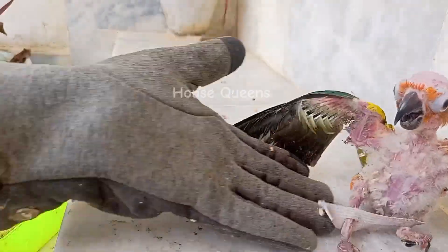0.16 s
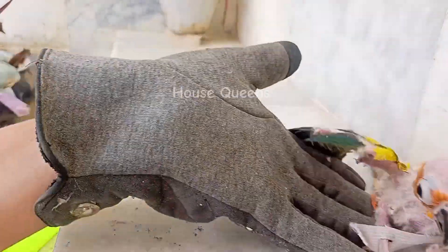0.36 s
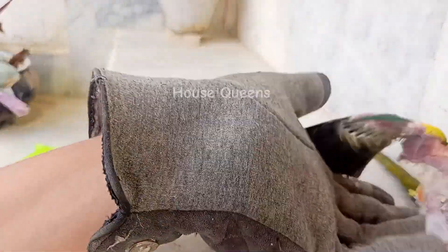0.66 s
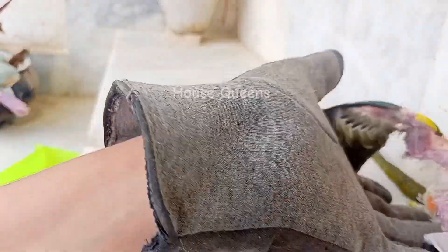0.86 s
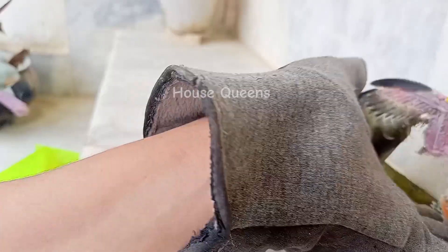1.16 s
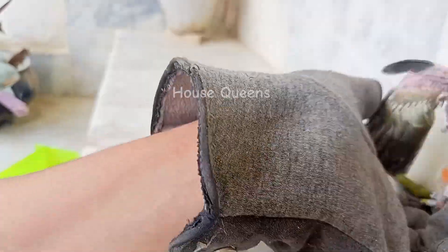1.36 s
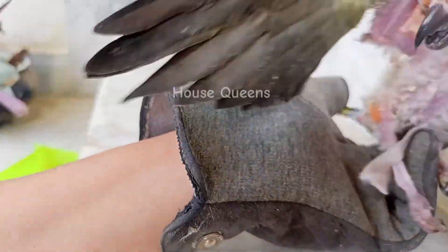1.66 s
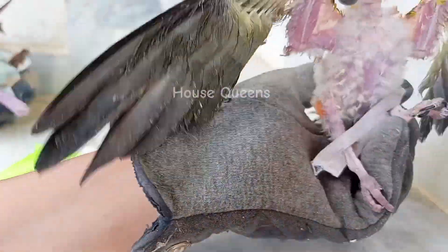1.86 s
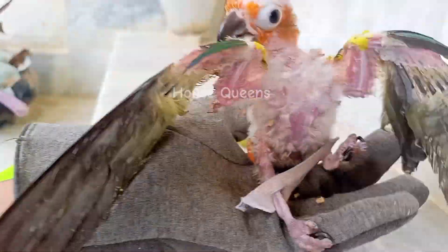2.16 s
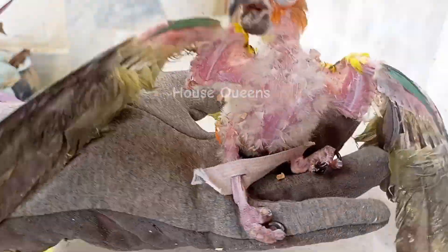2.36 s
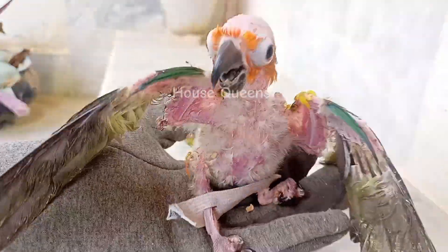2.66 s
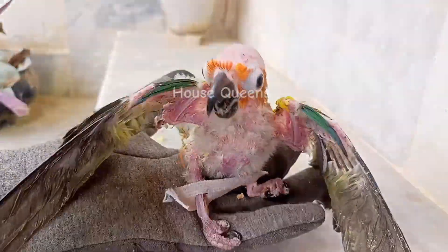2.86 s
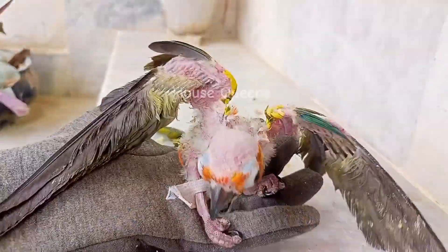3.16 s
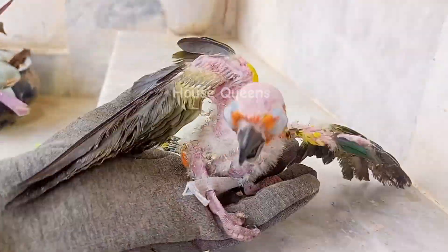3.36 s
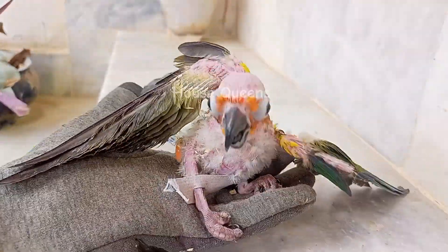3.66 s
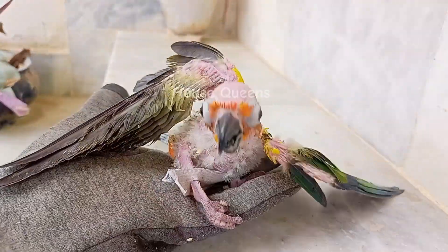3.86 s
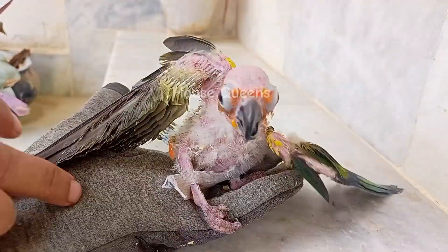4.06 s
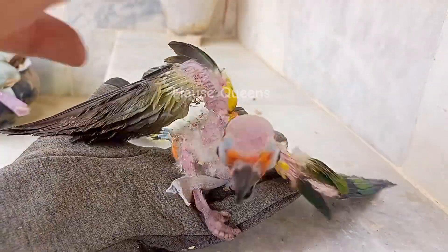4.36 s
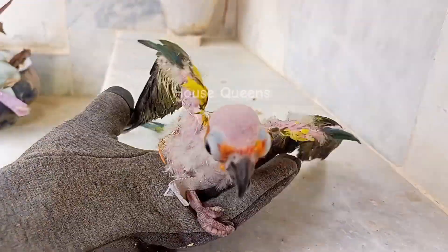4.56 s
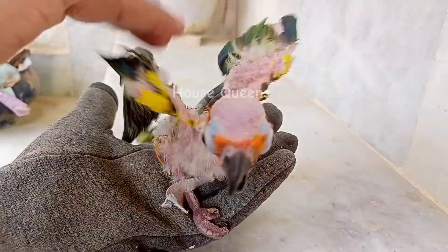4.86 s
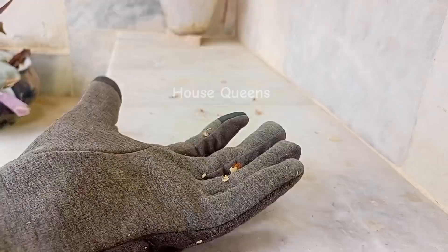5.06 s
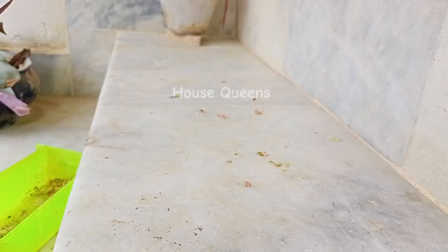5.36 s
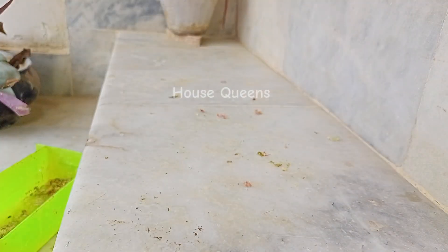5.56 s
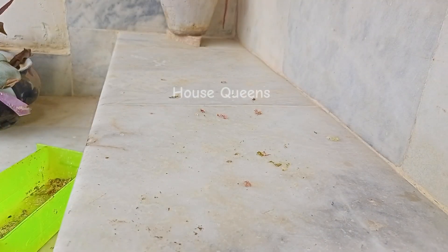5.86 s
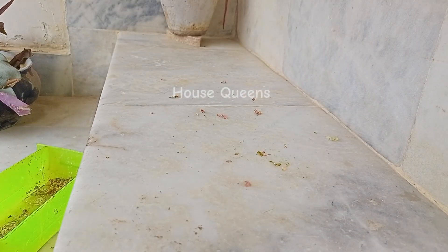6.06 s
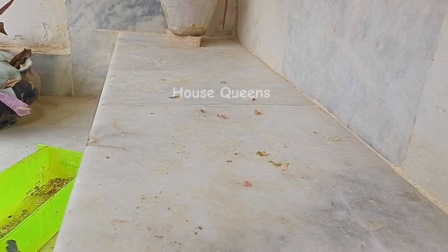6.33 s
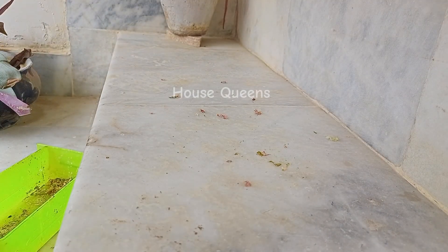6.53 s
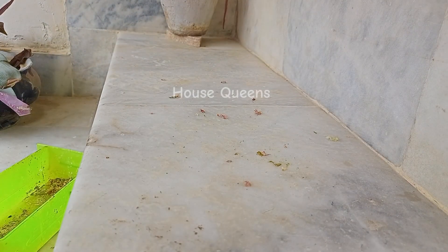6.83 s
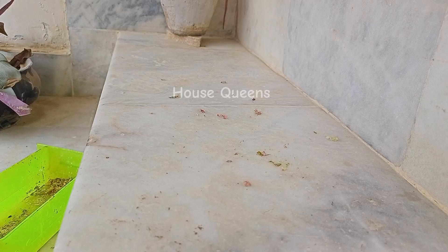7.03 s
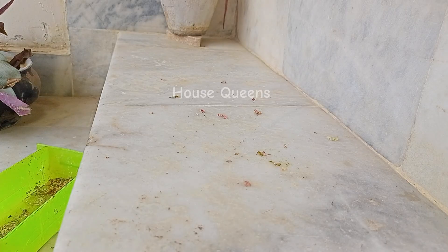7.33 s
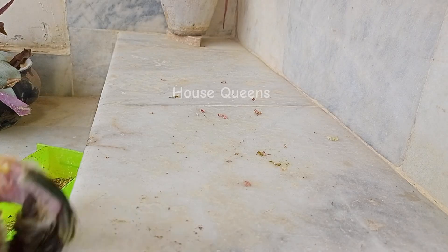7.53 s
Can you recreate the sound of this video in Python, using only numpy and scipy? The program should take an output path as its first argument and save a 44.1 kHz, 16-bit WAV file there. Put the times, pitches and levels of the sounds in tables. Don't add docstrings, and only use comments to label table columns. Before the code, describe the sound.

Hoarse, raspy chick cries come and go over a soft fan hum, with a sudden sharp croak, a wooden knock and echoing final squawks.

```python
import sys
import numpy as np
from scipy import signal
from scipy.fft import rfft, irfft, next_fast_len
from scipy.io import wavfile
from scipy.ndimage import uniform_filter1d, map_coordinates

SR = 44100
rng = np.random.default_rng(int(sys.argv[2]) if len(sys.argv) > 2 else 0)


def int16_out(signal):
    q = np.round(np.clip(np.atleast_2d(signal).T, -1, 1) * 32767)
    wavfile.write(sys.argv[1], SR, q.astype(np.int16))


def boost_factor(decibels):
    exponent = np.asarray(decibels, float) / 20
    return 10 ** exponent


N = 339129

# frequency in Hz, level in dB per Hz.
THROAT_COLOUR = [(1000, -49), (1700, -15.5), (1940, -23.5), (2230, -11.5), (2630, -5), (3230, -3),
                 (3540, -3.5), (4300, -5.5), (4590, -4), (5130, -14), (7170, -20), (8090, -9), (9740, -28),
                 (15600, -32)]


def unit(x):
    return x / np.sqrt(np.mean(x ** 2) + 1e-20)


def along(points, hz):
    f, v = np.transpose(points)
    return np.interp(np.log(hz + 1), np.log(f + 1), v)


def curve(rows):
    return np.interp(np.arange(N) / SR, *np.transpose(rows))


def wobble(rate, size=N):
    knots = rng.standard_normal(size // 30 + 4)
    return map_coordinates(knots, [np.arange(size) * min(rate, 1400) / SR])


def filtered(x, response):
    m = next_fast_len(N + SR // 2)
    return irfft(rfft(x, m) * response(np.fft.rfftfreq(m, 1 / SR)), m)[:N]


def hiss(spectrum, patchy_db=0):
    z = signal.stft(rng.standard_normal(N), nperseg=256)[2]
    patches = uniform_filter1d(rng.standard_normal(z.shape), 4, 0)
    patches = uniform_filter1d(patches, 10, 1)
    white = signal.istft(z * boost_factor(patchy_db * unit(patches)), nperseg=256)[1][:N]
    return unit(filtered(white, lambda hz: boost_factor(along(spectrum, hz))))


def add(track, s, sound):
    part = track[round(s * SR):][:len(sound)]
    part += sound[:len(part)]


def fan():
    # time in seconds, level in dB.
    drone = [(0.0, -36.5), (4.11, -37.5), (6.0, -41.5), (7.05, -39), (7.69, -42)]
    # frequency in Hz, level in dB per Hz.
    air = [(12, -58), (22, -19), (50, -9.5), (110, -6.5), (200, -7), (240, -1.5), (307, -9), (600, -12),
           (1000, -16.5), (1600, -19.5), (2400, -21), (3400, -25.5), (4500, -41.5), (6500, -51),
           (15600, -70)]
    # start in seconds, length in seconds, change in dB.
    duck = (4.9, .05, -13)
    t = np.arange(N) / SR
    hums = 0
    for hz, db, rate in [(99.1, -8, 30), (242.2, -11.5, 20)]:
        level = boost_factor(db + 2.5 * wobble(14))
        hums = hums + level * np.sin(2 * np.pi * hz * t + 2.18 * wobble(rate))
    start, length, duck_db = duck
    from_middle = (t - start - length / 2) / (length / 2)
    dip = duck_db * np.clip(1 - from_middle ** 4, 0, 1)
    return boost_factor(curve(drone) + 1.25 * wobble(5) + dip) * unit(hiss(air) + hums)


def feathers():
    # time in seconds, level in dB.
    rustle = [(0, -65), (.5, -64), (1.7, -59.5), (2.9, -61.5), (3.45, -66), (3.95, -65), (4.7, -62),
              (4.83, -59.5), (5.2, -61.5), (5.3, -72), (6.4, -67.5), (6.55, -64), (6.7, -71), (6.82, -56.5),
              (6.93, -63), (7.05, -70.5), (7.69, -77)]
    # frequency in Hz, level in dB per Hz.
    feather = [(2500, -39), (4200, -3.5), (6600, -14), (8200, -7.5), (10500, -25.5), (13500, -18.5),
               (15800, -20)]
    # time in seconds, peak in dB.
    ticks = [(0.4978, -55), (3.3294, -59), (3.4925, -58), (5.5144, -56)]
    gain = boost_factor(curve(rustle) + 3 * wobble(27) + 2 * wobble(300))
    for s, db in ticks:
        t = np.arange(SR // 10) / SR
        add(gain, s, boost_factor(db + 1 - 60 * t / 0.064))
    return gain * hiss(feather, patchy_db=4)


def voices():
    # start in seconds, length in seconds, half pitch from Hz, to Hz, level in dB.
    full = [(2.67, .1, 1018, 1000, -31), (4.24, .105, 1210, 1098, -19.5), (4.355, .14, 1146, 1059, -20),
            (4.505, .115, 1143, 1088, -24), (7.462, .108, 1110, 1126, -25.5)]
    deep = [(6.15, 0.0844, 813, 787, -20)]
    shut = [(0.745, .076, 1032, 1085, -29), (0.826, 0.1006, 1213, 1135, -34), (0.93, .12, 1122, 954, -26.5),
            (1.376, .075, 1036, 1023, -28), (1.98, 0.1794, 997, 996, -32), (2.168, .04, 1190, 1175, -34.5),
            (4.165, .08, 987, 1068, -30.5)]
    doubled = [(0.692, .065, 1120, 1063, -36.5), (1.049, 0.15, 1042, 1014, -30.5),
               (1.449, 0.076, 1140, 1170, -30), (2.35, .08, 1156, 1067, -34),
               (4.62, 0.054, 1370, 1373, -41)]
    thin = [(1.225, .032, 1185, 1224, -40), (1.6, 0.056, 1120, 1110, -41), (1.761, .07, 1240, 1222, -39),
            (1.863, 0.031, 1357, 1385, -31), (2.953, .065, 1310, 1220, -40),
            (4.035, .045, 1417, 1308, -38.5)]
    high = [(0.039, 0.052, 1450, 1330, -37.5), (1.257, 0.11, 1386, 1675, -35),
            (2.208, .07, 1544, 1610, -31), (2.563, 0.1076, 1495, 1515, -35.5),
            (7.578, 0.114, 1345, 1430, -33.5)]
    raw = [(0.579, .11, 1327, 1228, -37), (1.884, 0.0887, 1543, 1484, -32), (2.28, .07, 1317, 1350, -34),
           (2.43, 0.12, 1408, 1400, -35), (4.081, .075, 1380, 1473, -38)]
    bright = [(0.099, .15, 1093, 1094, -23), (7.338, .126, 1169, 1002, -23.5)]
    clear = [(3.85, .08, 799.5, 804.5, -35)]
    faint = [(3.022, 0.075, 1540, 1560, -40), (3.182, .085, 1385, 1393, -45),
             (3.702, 0.13, 1493, 1494, -45.5), (5.977, 0.099, 1200, 1350, -39)]
    return full, deep, shut, doubled, thin, high, raw, bright, clear, faint


def shape(t, start, length, attack):
    onset_db, release_db = -9.5, -22
    enter_db, leave_db, enter_share = -9.5, -6, 0.38
    join_s = 0.012
    s, n = np.transpose([row[:2] for voice in voices() for row in voice])

    def touch(gap):
        return np.clip(1 - np.abs(gap).min() / join_s, 0, 1)

    enter, leave = touch(s + n - start), touch(s - start - length)
    attack = min(attack * (1 - enter * (1 - enter_share)), 0.87 * length)
    rise = np.clip(1 - (t - start) / attack, 0, 1) * (onset_db + enter * (enter_db - onset_db))
    fall = np.clip((t - start - attack) / (length - attack), 0, 1) ** 1.51
    return rise + fall * (release_db + leave * (leave_db - release_db))


def membrane(phase, levels, jitter_hz):
    n = len(phase)
    fuzz = 0.3 + jitter_hz / 28
    voice = 0
    for k, db in levels.items():
        rate = 150 + 2.2 * k * jitter_hz
        smear = fuzz * (wobble(rate, size=n) + 1j * wobble(rate, size=n))
        line = ((1 + smear) * np.exp(1j * k * phase)).real
        voice = voice + boost_factor(db + 6.5) * line / np.sqrt(1 + 2 * fuzz ** 2)
    return voice


def squawks():
    # 2nd, 3rd, 4th multiple, upper voice, all in dB against the level.
    multiples = [(-4, -6, -1, -7), (-7.5, -9, -1, -12), (-53, -7.5, 0, -11), (-17, -2, -11, -9),
                 (-1, -33, -2, 3), (1.5, -31, -8, -4.5), (1, 0.5, -9, -11.5), (-4.5, -9, 0, -6),
                 (-4, -24, -2, -6), (-4, 0, -16, -13)]
    jitter = [27, 30, 36, 52, 32, 30, 46, 22, 9, 58]
    # rasp in dB against the voice, attack in seconds, trill depth in dB.
    hoarse = [(-5, 0.052, 0), (-2, .04, 5.5), (0, 0.052, -1.5), (2.5, 0.036, 0.5), (-10, 0.015, -1.5),
              (-3.5, 0.023, 0), (0, 0.042, -0.5), (-6, 0.047, -0.5), (-7, 0.019, .8), (1, 0.033, -1.5)]
    # time in seconds, extra level in dB.
    throbs = [(7.395, 3.5), (7.421, 3)]
    trill_hz, trill_lag_s = 88, 0.004
    catch_s, catch_db = 0.018, -6
    fade = 0.012
    out, breath = np.zeros(N), hiss(THROAT_COLOUR, patchy_db=6)
    notes = [(*row, mix, jitter_hz, *rough)
             for rows, mix, jitter_hz, rough in zip(voices(), multiples, jitter, hoarse)
             for row in rows]
    for s, length, from_hz, to_hz, level_db, mix, jitter_hz, rasp_db, attack, trill_db in notes:
        span = np.arange(round(s * SR), min(round((s + length + fade) * SR), N))
        t, n = span / SR, len(span)
        sink_db = shape(t, s, length, attack)

        pitch = from_hz + (to_hz - from_hz) * (np.abs(t - s) / length) ** 0.75
        pitch = pitch * (1 + 0.0015 * sink_db)
        phase = 2 * np.pi * np.cumsum(pitch + 0.345 * jitter_hz * wobble(201.2, size=n)) / SR

        second, third, fourth, upper = [level_db + db + sink_db * (1 + 0.094 * (k - 1))
                                        for k, db in enumerate(mix)]
        brighten_db = 0.1 * (level_db + 27)
        fourth, upper = fourth + brighten_db, upper + brighten_db
        doubling = np.clip(third - np.maximum(second, fourth), -18, 0)
        levels = {2: second, 3: third, 4: fourth}
        for k in range(5, 14):
            lift = np.minimum(along(THROAT_COLOUR, k * pitch) - along(THROAT_COLOUR, 8440), 1.5)
            levels[k] = upper - 5 + lift + doubling * (k % 2)
        voice = membrane(phase, levels, jitter_hz)

        effort = np.sqrt(boost_factor(2 * second) + boost_factor(2 * third) + boost_factor(2 * fourth) + 6 * boost_factor(2 * upper))
        trill = trill_db * np.cos(2 * np.pi * trill_hz * (t - s - trill_lag_s))
        flutter = boost_factor(wobble(133, size=n) + trill)
        catch = boost_factor(catch_db * np.clip(1 - (t - s) / catch_s, 0, 1))
        to_edge = np.minimum(t - t[0], (t[-1] - t) / 2)
        edges = np.sin(np.pi / 2 * np.clip(to_edge / fade, 0, 1)) ** 0.38
        out[span] += edges * flutter * (catch * voice + effort * boost_factor(rasp_db) * breath[span])
    throb_db = np.zeros(N)
    for s, db in throbs:
        add(throb_db, s - 0.005, db * np.hanning(SR // 100))
    return out * boost_factor(throb_db)


def peeps():
    # start in
    # seconds, length in seconds, pitch in Hz, level in dB, octave in dB.
    peep_notes = [(0.191, 0.56, 879, -42.5, -10.5), (0.266, 0.095, 3460, -49.5, 1),
                  (1.1, .12, 3020, -56.5, 17.5), (1.255, 0.032, 4640, -40, -12), (1.3, 0.09, 3150, -73, 9),
                  (1.604, 0.072, 3060, -55, 22), (1.764, 0.061, 2900, -45, 10),
                  (2.05, 0.083, 1944, -39.5, -20), (2.5, 0.063, 1550, -43.5, -20),
                  (4.08, 0.047, 4050, -31, -9), (4.838, 0.03, 4400, -40, -17),
                  (5.529, 0.15, 1700, -53, -25), (5.98, .04, 3100, -58, 8), (6.515, 0.059, 4840, -51, -14),
                  (6.7, 0.041, 3000, -49, -29), (6.79, .11, 3500, -64, 3), (6.852, 0.092, 1300, -53, -23),
                  (7.59, 0.07, 5440, -28.5, -19), (7.663, 0.038, 4170, -32.5, -8)]
    out = np.zeros(N)
    for s, length, hz, db, octave_db in peep_notes:
        u = np.arange(round(length * SR)) / (length * SR)
        wander_hz = 61 + 0.033 * hz
        phase = 2 * np.pi * np.cumsum(hz + wander_hz * wobble(450, size=len(u))) / SR
        swell = np.sin(np.pi * u ** 0.5) * boost_factor(db + 3.5 * wobble(78.5, size=len(u)))
        add(out, s, swell * (np.sin(phase) + boost_factor(octave_db) * np.sin(2 * phase)))
    return out


def croak():
    # start in seconds, length in seconds, pitch in Hz, level in dB, overtones in dB.
    rich = [(4.863, 0.0063, 725, -23.5, -2), (4.871, 0.0027, 910, -20.5, 1), (4.876, .007, 1940, -31, 14),
            (4.884, 0.0021, 1470, -25.5, 10.5), (4.897, .005, 1745, -25.5, 15.5),
            (4.911, .008, 2023, -20, 8.5), (4.937, 0.0073, 1990, -32.5, 10)]
    # start in seconds, length in seconds, pitch in Hz, level in dB.
    pips = [(4.884, 0.0061, 3800, -7), (4.886, 0.0069, 3020, -9.5), (4.9, .01, 2430, -16.5),
            (4.915, 0.0086, 2510, -20.5), (4.926, 0.014, 2460, -18.5), (4.938, 0.011, 2400, -17.5),
            (6.126, 0.0047, 3120, -22), (6.137, 0.0031, 3260, -16.5), (6.1667, 0.0061, 3040, -4.5),
            (6.179, 0.012, 3200, -7), (6.201, 0.012, 3190, -7.5), (6.213, 0.0072, 2940, -6.5)]
    # start and length in seconds, pitch in Hz, level and overtones in dB, rise as a share.
    gulp = (6.111, .025, 630, -38, -8, .94)
    out = np.zeros(N)
    slips = [(*row, 0.183) for row in rich] + [(*row, -19, 0.114) for row in pips] + [gulp]
    for s, length, hz, db, over_db, rise in slips:
        u = np.arange(round(1.6 * length * SR)) / (length * SR)
        phase = 2 * np.pi * np.cumsum(hz * (1 + rise * u + 0.058 * wobble(910, size=len(u)))) / SR
        over = sum(boost_factor(along(THROAT_COLOUR, k * hz) * 0.8 - 3 * (k - 2)) * np.sin(k * phase)
                   for k in range(2, 10) if k * hz < 15000)
        quick = np.exp(-0.7 * u)
        swell = boost_factor(db) * np.sin(np.pi * (u / 1.16) ** 0.41) ** 2
        add(out, s, swell * (np.sin(phase) + boost_factor(over_db + 7.5) * quick * over))
    for s, db in [(4.897, -9), (4.912, -16.5)]:
        t = np.arange(SR // 50) / SR
        add(out, s, boost_factor(db) * np.sin(2 * np.pi * 190 * t) * np.exp(-t / 0.0012))
    return out


def knock():
    # time in seconds, level in dB.
    blows = [
        (5.679, -10),
        (5.686, -8),
        (5.696, -9),
    ]
    # frequency in Hz, width in Hz, level in dB.
    wood = [(209, 15, 2), (647, 60, -1.5), (1746, 27, -1.5), (2270, 63, -30)]
    blow = np.zeros(N)
    for s, db in blows:
        add(blow, s, boost_factor(db) * np.hanning(30) * 2)

    def board(f):
        return sum((-1) ** k * boost_factor(db) * 1j * f * width / (hz * hz - f * f + 1j * f * width)
                   for k, (hz, width, db) in enumerate(wood))

    return filtered(blow, board)


def room(x):
    # frequency in Hz, time to fall 60 dB in seconds.
    walls = [(500, 0.14), (3000, 0.27), (8000, 0.21), (15000, 0.12)]
    hz, t, z = signal.stft(rng.standard_normal((2, SR // 2)), SR, nperseg=256)
    decay = boost_factor(-60 * t / along(walls, hz)[:, None])
    tails = signal.istft(z * decay, SR, nperseg=256)[1]
    tails = tails / np.linalg.norm(tails[0])
    turn = np.sin(2 * np.pi * 3.1 * np.arange(N) / SR) ** 2
    wet = signal.fftconvolve([x * turn, x * (1 - turn)], tails, axes=1).sum(0)
    return np.pad(wet, (200, 0))[:N]


def scene():
    near, slips, peep_mix = squawks() + knock(), croak(), peeps()
    echo = room(boost_factor(-6) * near + boost_factor(-15) * slips + boost_factor(0.5) * peep_mix)
    return (near + slips + peep_mix + echo + feathers() + fan())[None]


def roll_off(x):
    return signal.sosfilt(signal.butter(12, 15790, fs=SR, output="sos"), x)


def record(dry):
    ceiling, knee = 0.82, 6
    mix = dry / (1 + np.abs(dry / ceiling) ** knee) ** (1 / knee)
    return roll_off(mix)


dry = scene()
out = record(dry)
int16_out(out)
```